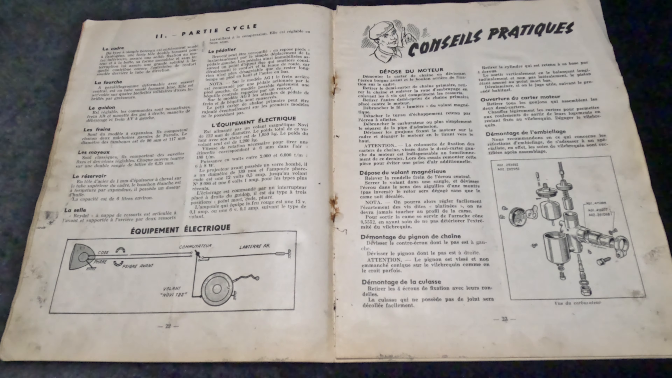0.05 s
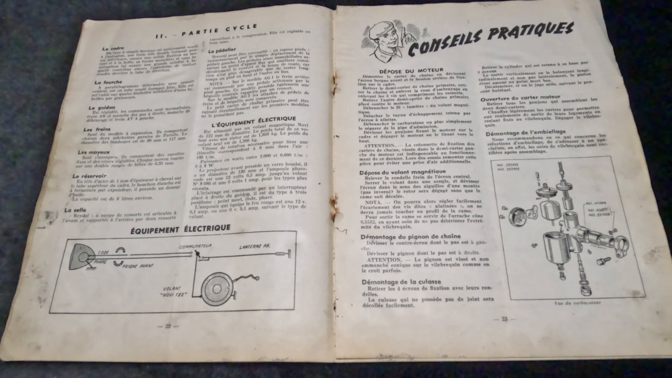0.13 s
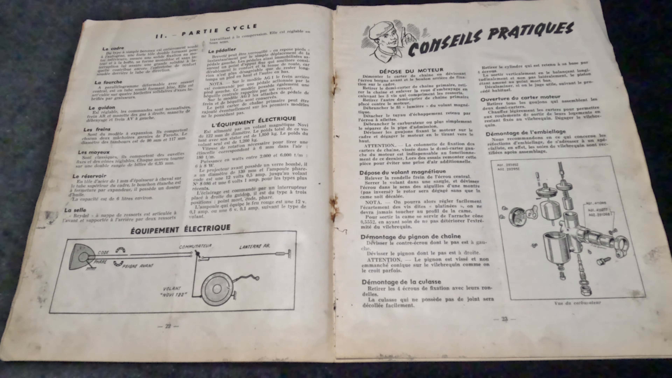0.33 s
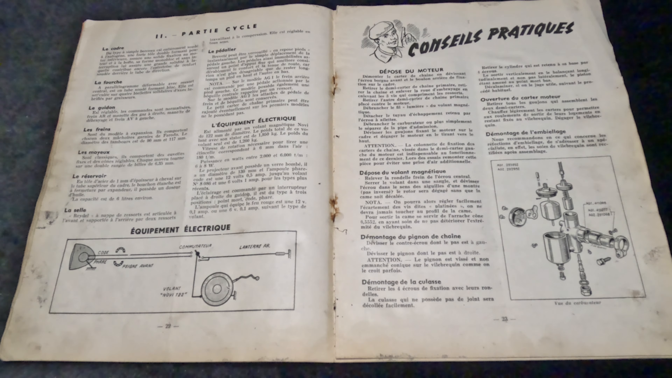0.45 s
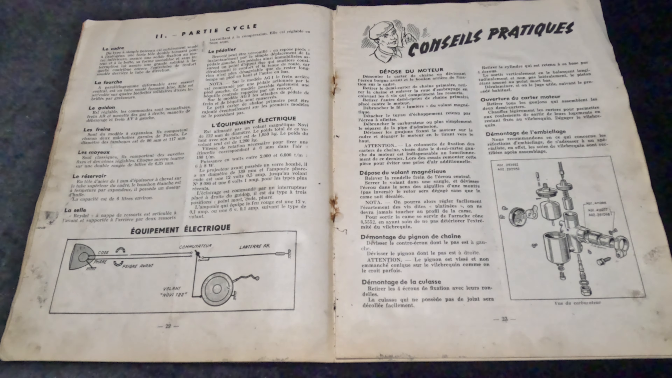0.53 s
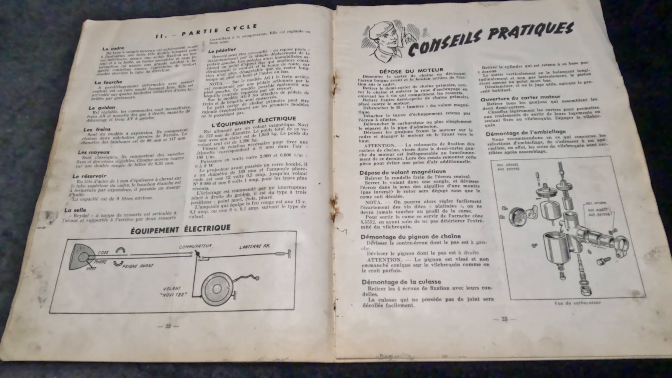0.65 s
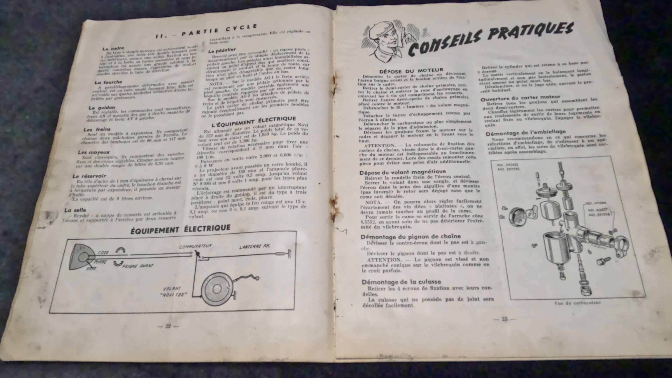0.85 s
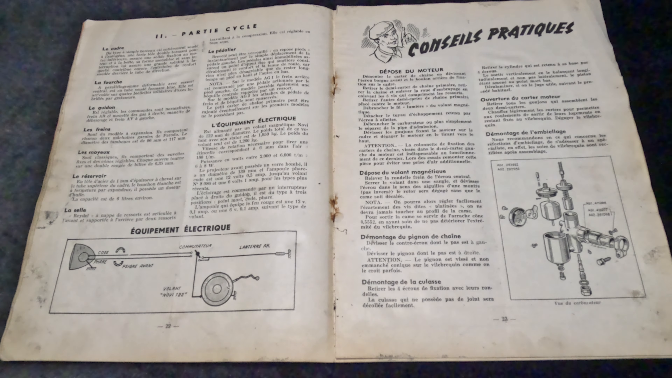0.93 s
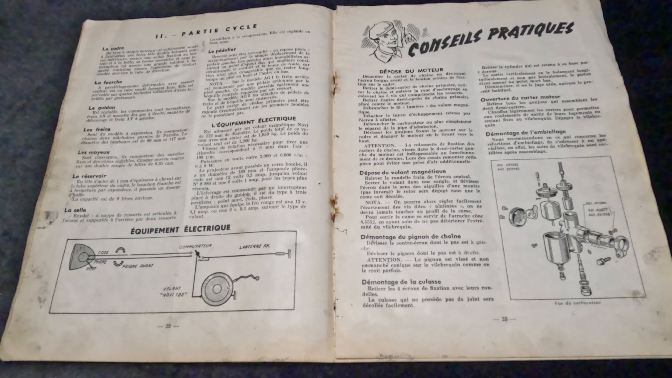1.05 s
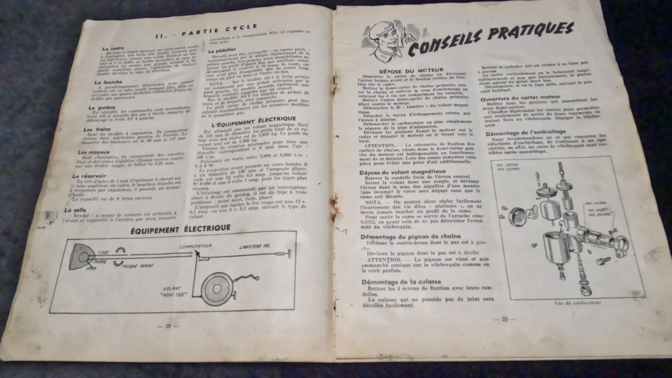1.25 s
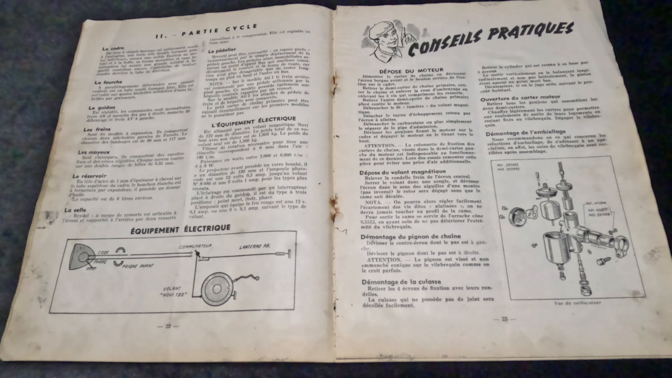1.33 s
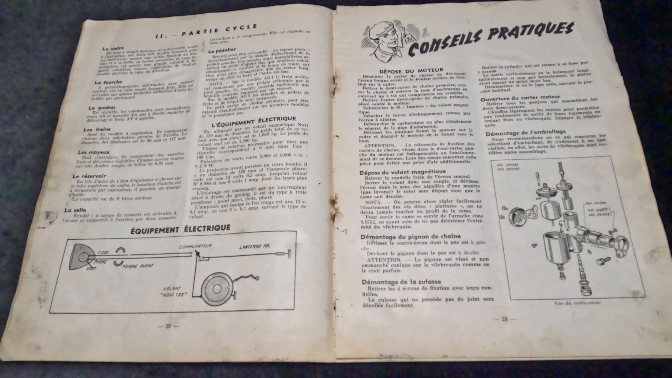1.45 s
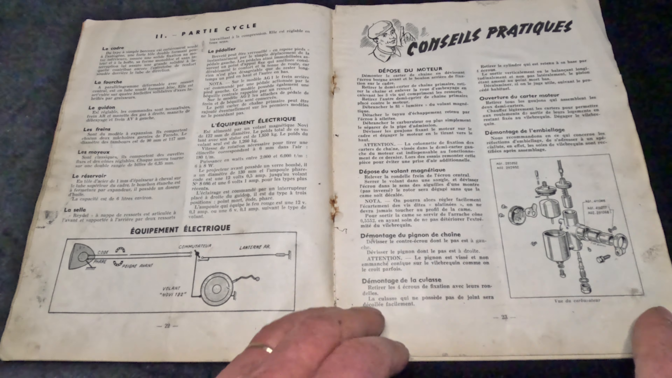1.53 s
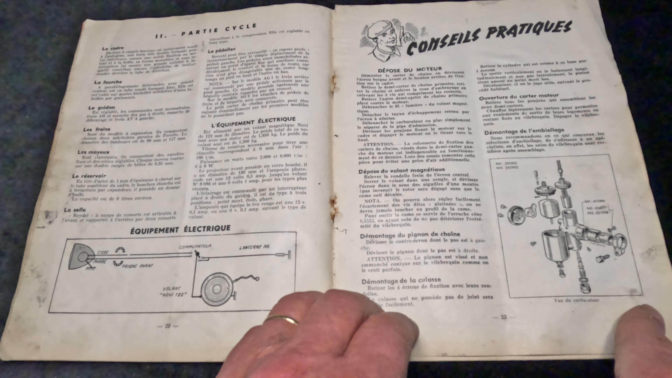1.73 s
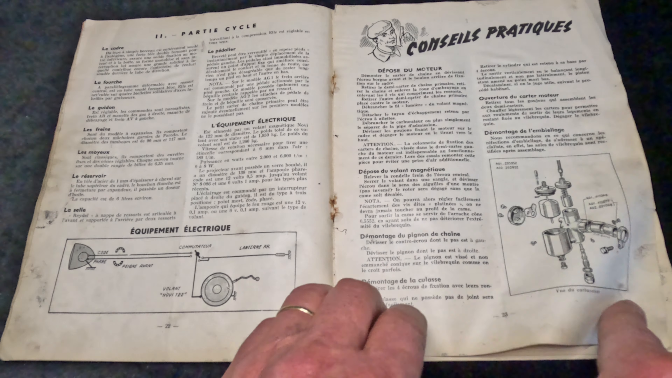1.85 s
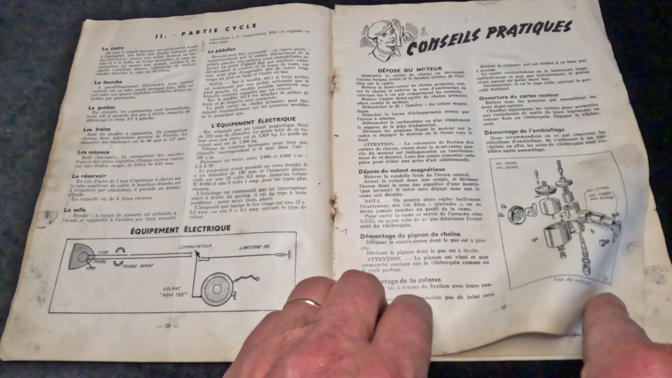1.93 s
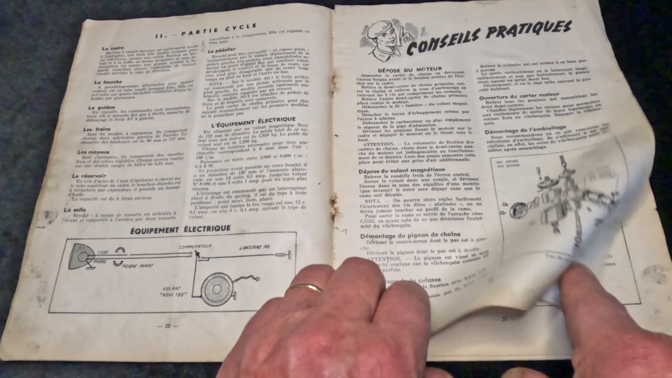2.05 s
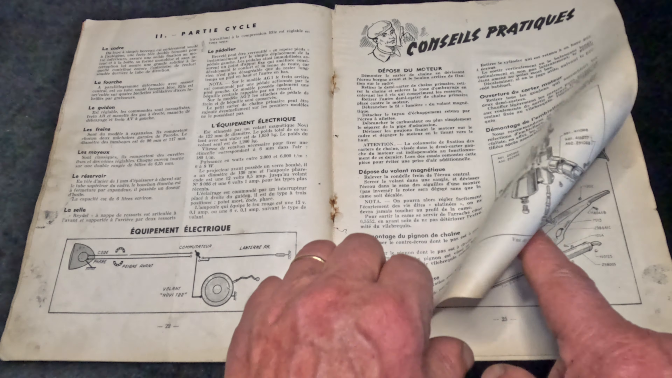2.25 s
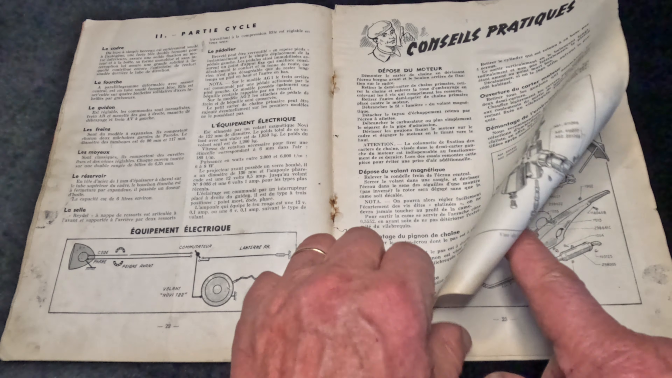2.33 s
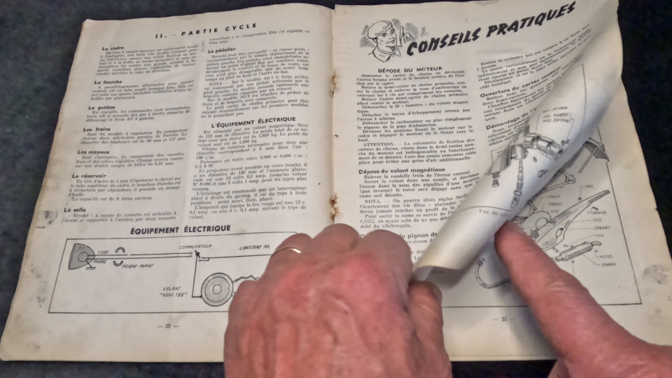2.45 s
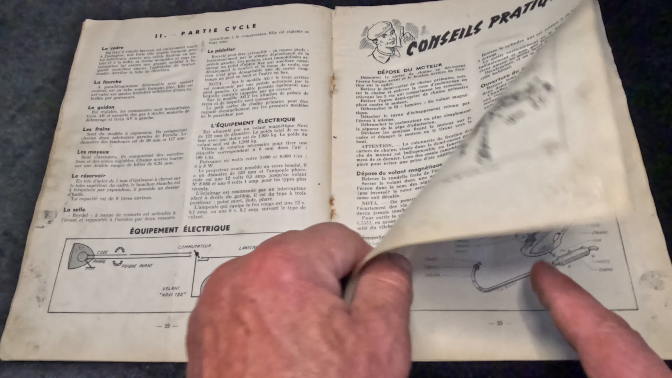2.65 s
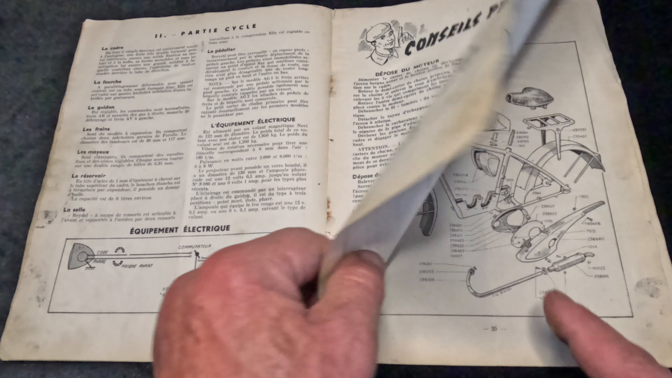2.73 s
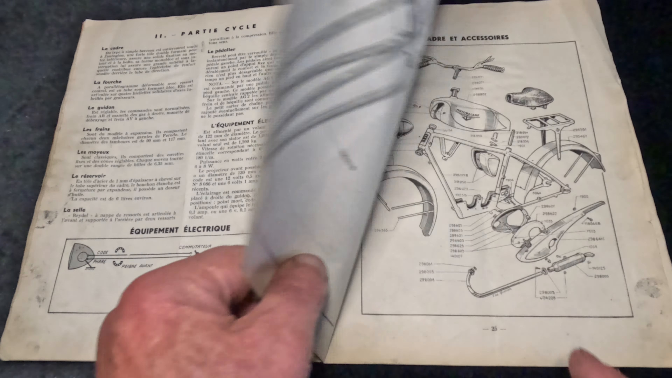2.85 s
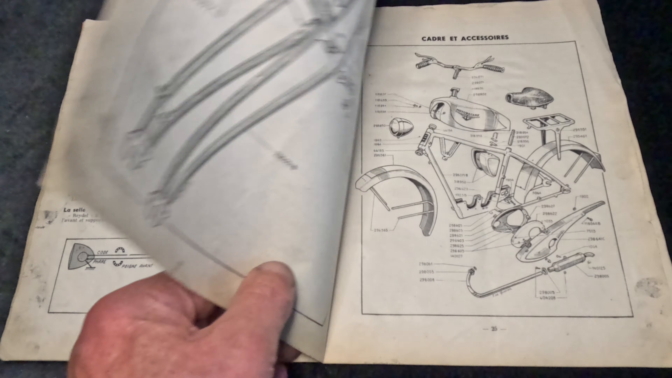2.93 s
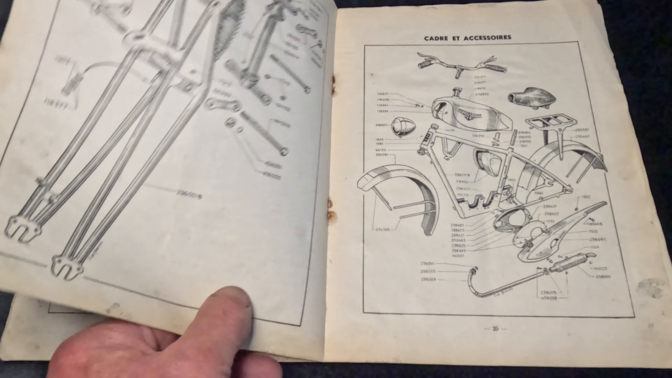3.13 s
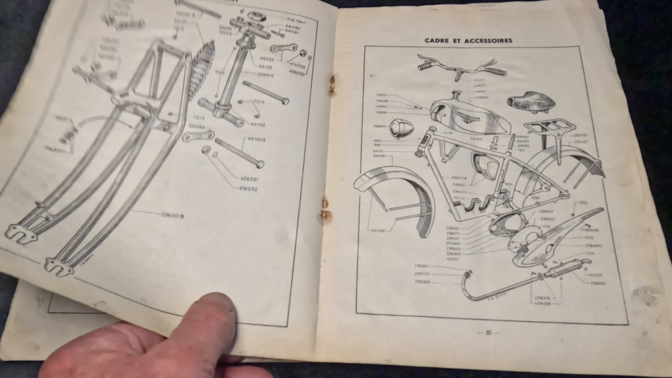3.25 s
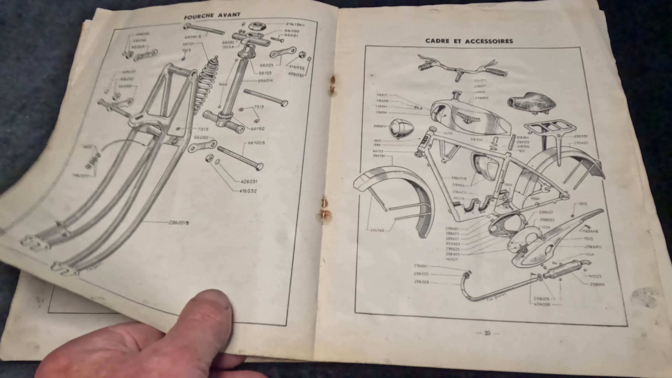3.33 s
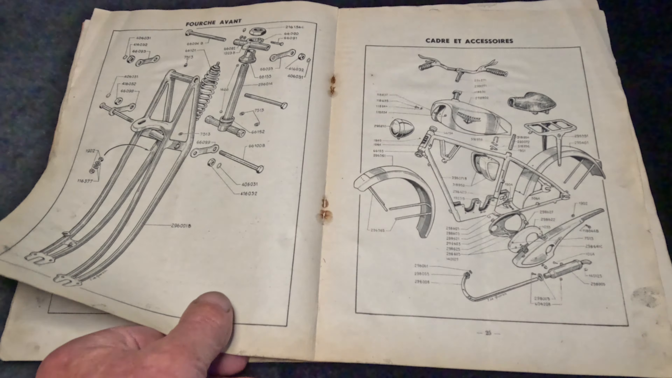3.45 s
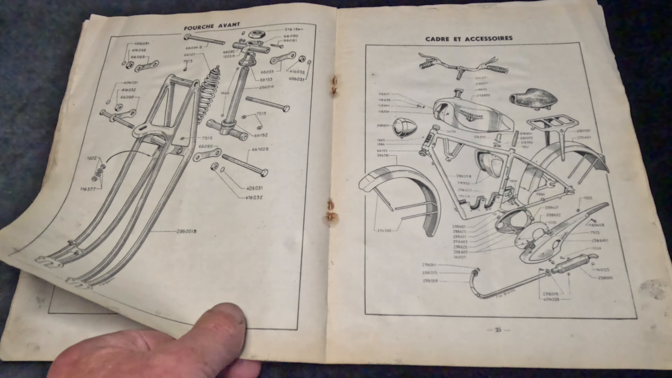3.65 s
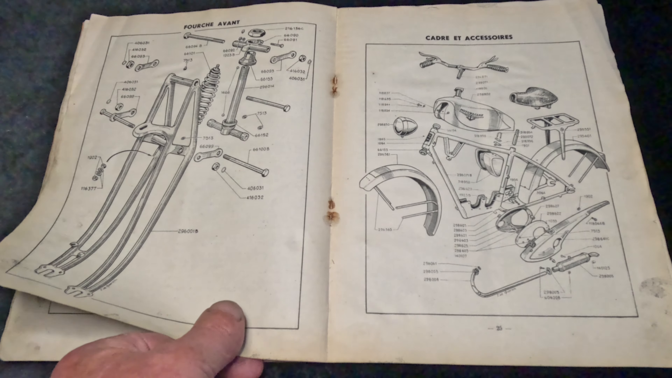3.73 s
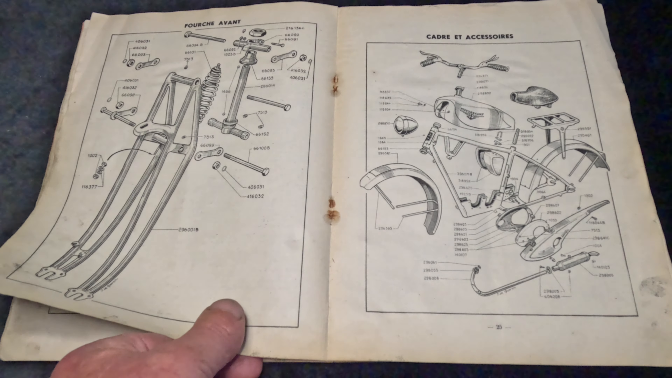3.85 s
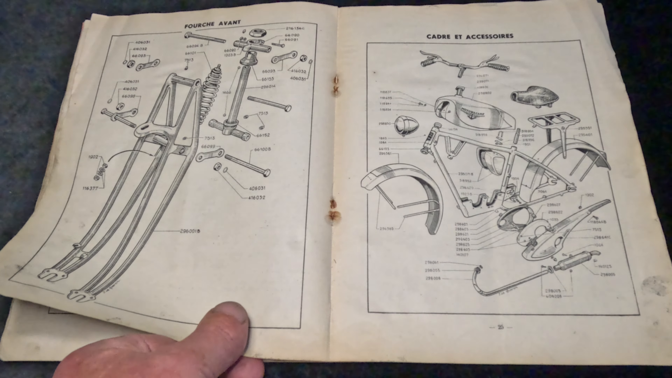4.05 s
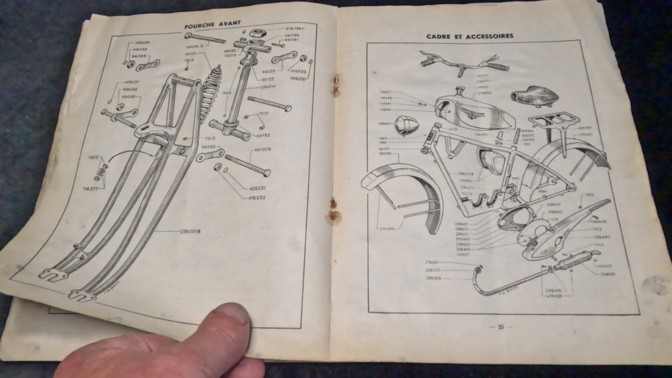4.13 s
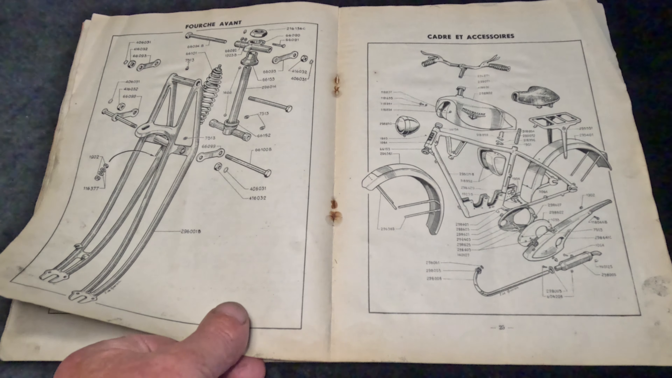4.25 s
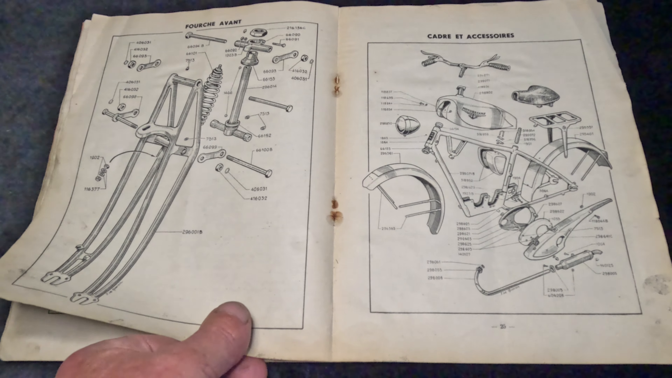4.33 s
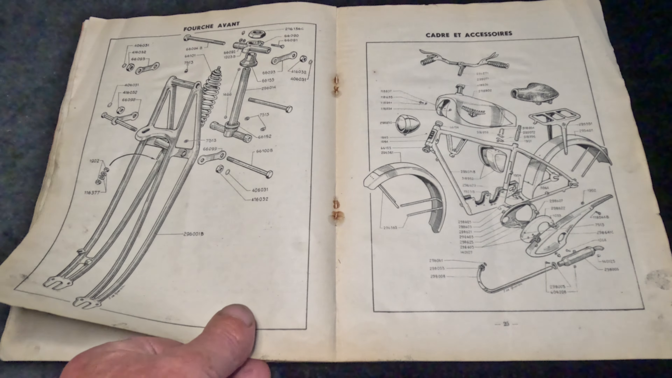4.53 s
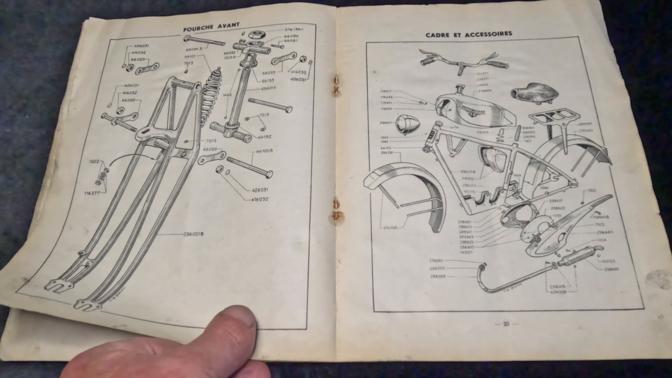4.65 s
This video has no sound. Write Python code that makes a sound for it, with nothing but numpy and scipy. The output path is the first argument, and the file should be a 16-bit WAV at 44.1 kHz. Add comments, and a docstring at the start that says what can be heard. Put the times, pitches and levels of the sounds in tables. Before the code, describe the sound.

Close up, a dry booklet page is peeled, swung over with crisp rustling and pops, and settled with a soft thump and small finger rubs.

```python
"""One page of an old paper booklet is lifted, turned and laid down by hand on a table in a small quiet room.
The sheet slides with a grainy hiss (clicks and noise shaped by touch) and buckles in dry snaps (bursts of folds
that ring the paper's modes). Damped swings make soft thumps, ringing notes make taps, and one rasp swells and
stops dead; then the fingers shift on the paper a few times.
A wavering low room hum and faint air (coloured noise) lie underneath; the stereo microphone is close."""
import sys
import numpy as np
from scipy import signal
from scipy.fft import rfft, irfft
from scipy.io import wavfile
from scipy.ndimage import uniform_filter1d, map_coordinates

SR = 44100
rng = np.random.default_rng(int(sys.argv[2]) if len(sys.argv) > 2 else 0)


def log_audio(samples):
    """Write samples as a 16-bit WAV file to the path given in sys.argv[1]."""
    # one column per channel
    frames = np.atleast_2d(samples).T
    # limit to full scale, then quantise
    limited = np.clip(frames, -1, 1)
    pcm = np.round(limited * 32767).astype(np.int16)
    wavfile.write(sys.argv[1], SR, pcm)


N = 325899
TIME = np.arange(N) / SR
BINS = np.maximum(np.fft.rfftfreq(N, 1 / SR), 1)

# resonances of the bent sheet: (frequency [Hz], width [Hz], relative level [dB])
SHEET_MODES = [(1036, 73, 5), (1200, 89, 7), (1620, 350, 3.5), (2110, 220, 0.5), (2530, 320, 1.5),
               (3000, 280, 0), (3700, 210, 5.5), (5000, 710, 0), (6860, 1200, -3), (9800, 1400, -10)]
# the fingers peel the page up, swing it over and lay it down, before trims:
# (time [s], friction [dB], rustle of the broad sheet [dB])
PEEL_UP = [(1.75, -91, -78), (1.79, -48, -73), (1.825, -42, -52), (1.92, -39.5, -41.5), (2.02, -45, -51.5),
           (2.09, -43.5, -44.5), (2.22, -46, -46), (2.315, -52, -47.5), (2.35, -48, -50),
           (2.47, -47.5, -46), (2.51, -58, -55)]
SWING_OVER = [(2.51, -47, -55), (2.56, -46.5, -40), (2.63, -49, -44.5), (2.665, -46.5, -39.5),
              (2.78, -49.5, -43), (2.84, -49.5, -41), (2.94, -50, -46.5), (3.04, -50.5, -48),
              (3.1, -56.5, -54.5), (3.125, -50, -46), (3.17, -54.5, -57)]
LAY_FLAT = [(3.17, -54.5, -52.5), (3.29, -44.5, -45), (3.385, -48.5, -46.5), (3.42, -53, -52),
            (3.465, -56, -61), (3.5, -50.5, -62), (3.545, -53, -53.5), (3.64, -43.5, -52.5),
            (3.71, -61, -64)]
PAGE_TURN = PEEL_UP + SWING_OVER + LAY_FLAT


def from_db(db):
    """Decibels to gain."""
    return 10 ** (np.asarray(db) / 20)


def rms_one(x):
    """Scale to unit rms."""
    return x / np.sqrt(np.mean(x ** 2) + 1e-20)


def per_bin(points):
    """A (frequency [Hz], value) table joined on a log-frequency axis."""
    hz, value = np.transpose(points)
    return np.interp(np.log(BINS), np.log(hz), value)


def over_time(points):
    """A (time [s], value) table joined by straight lines."""
    return np.interp(TIME, *np.transpose(points))


def coloured(x, spectrum):
    """Filter by a spectrum table, then scale to unit rms."""
    return rms_one(irfft(rfft(x) * from_db(per_bin(spectrum)), N))


def gain_curve(table, column):
    """Gain in time from one dB column of a movement, silent before and after it."""
    rows = np.array(table)
    gain = np.zeros(N)
    during = (TIME >= rows[0, 0]) & (TIME < rows[-1, 0])
    gain[during] = from_db(np.interp(TIME[during], rows[:, 0], rows[:, column]))
    return uniform_filter1d(gain, size=128)


def drift(rate_hz):
    """Slow random wandering with unit rms."""
    points = 8192
    hz = np.fft.rfftfreq(points, N / SR / points)
    slow = rms_one(irfft(rfft(rng.standard_normal(points)) / (1 + (hz / rate_hz) ** 2), points))
    return np.interp(np.arange(N) * points / N, np.arange(points), slow)


def cut(x, hz, kind, order=2):
    """Causal high- or low-pass."""
    return signal.sosfilt(signal.butter(order, min(hz, .45 * SR), kind, fs=SR, output="sos"), x)


def resonance(x, hz, width_hz):
    """A two-pole resonance with gain 1 on top."""
    r = np.exp(-np.pi * width_hz / SR)
    feedback = [1, -2 * r * np.cos(2 * np.pi * hz / SR), r * r]
    return signal.lfilter(np.array([1, 0, -1]) * (1 - r * r) / 2, feedback, x)


def panned(db):
    """Left and right gains for a left-minus-right difference."""
    return from_db(np.array([db, -db]) / 2)


def add(out, s, sound, peak_db):
    """Lay a short sound in at a time and a peak level."""
    at = round(s * SR)
    out[at:at + len(sound)] += (from_db(peak_db) * sound / np.abs(sound).max())[:N - at]


def stroke(t, rise_s, hold_s, release_db_per_s):
    """Gain of one hand movement: it swells, sags a little while held, and dies away."""
    rise_db, sag_db_per_s = 21.5, 8
    rise_s = max(rise_s, .003)
    rising = rise_db * np.minimum(t / rise_s - 1, 0)
    sagging = sag_db_per_s * np.maximum(t - rise_s, 0)
    releasing = release_db_per_s * np.maximum(t - rise_s - hold_s, 0)
    return from_db(np.maximum(rising - sagging - releasing, -200))


def fibres(per_s, spread_db, smooth_db, judder_db):
    """Fibres catch and let go: tiny uneven clicks over a smooth hiss, in clumps as the sheet judders."""
    sizes = from_db(spread_db * np.minimum(rng.exponential(1, N), 3)) * rng.choice([-1, 1], N)
    clicks = rms_one(sizes * (rng.random(N) < per_s / SR))
    smooth = from_db(smooth_db) * rng.standard_normal(N)
    return (clicks + smooth) * from_db(judder_db * drift(24))


def pops(per_s, spread_db, clump_db):
    """Lone clicks of uneven size that come in clumps."""
    at = np.flatnonzero(rng.random(N) < per_s / SR * from_db(clump_db * drift(14)))
    out = np.full(N, 1e-18)
    sizes = from_db(spread_db * np.minimum(rng.exponential(1, len(at)), 2))
    out[at] = sizes * rng.choice([-1, 1], len(at))
    return out


def room_tone(spectrum):
    """Steady stereo noise, partly alike in both channels, with a left-right balance that varies with pitch."""
    # (frequency [Hz], left-right likeness [0-1])
    likeness = [(30, 0.98), (80, 0.72), (130, 0.87), (290, 0.49), (640, 0.18), (3000, 0.44), (6800, 1),
                (14000, 0.12)]
    # (frequency [Hz], left minus right [dB])
    balance = [(60, -2.5), (150, -3.5), (380, -6), (950, -5), (2370, 0), (5950, 3), (14900, 9.5)]
    mid, side = rfft(rng.standard_normal((2, N)))
    alike = np.clip(per_bin(likeness), 0, 1)
    pair = np.sqrt(1 + alike) * mid + np.sqrt(1 - alike) * side * [[1], [-1]]
    return coloured(irfft(pair * panned(per_bin(balance)), N), spectrum)


def air():
    """Faint steady noise fills the room above the hum."""
    # (frequency [Hz], relative density [dB])
    air_spectrum = [(300, -12), (480, 0.5), (800, -4), (1250, -2), (1900, -9.5), (3500, -15.3),
                    (7600, -18.5), (8300, -23.5), (10800, -22.5), (12000, -30.5), (15000, -39.5)]
    return from_db(-62.3) * room_tone(air_spectrum)


def hum(hum_hz=168, width_hz=42, bed_db=-58, waver_db=3.0, rumble_hz=55, rumble_db=-71.0, rumble_waver_db=6.0):
    """A broad, steady drone with one low resonance that wavers, over a deep rumble that comes and goes."""
    # (frequency [Hz], relative density [dB])
    hum_spectrum = [(12, -31), (20, -4), (51, -7), (70, -12.5), (92, -10.5), (114, -28), (134, -7.5),
                    (163, -3), (276, -8.5), (312, -8), (338, -9), (372, -13.5), (403, -13), (500, -22.5),
                    (650, -20.5), (1100, -120)]
    # level of the low resonance before it wavers: (time [s], level [dB])
    resonance_swell = [(0.0, -49), (0.28, -64), (1.4, -62), (1.54, -51.5), (1.7, -79), (2.1, -52.5),
                       (2.7, -70), (3.45, -52.5), (3.62, -52.5), (3.9, -59.5), (7.39, -64.5)]
    bed = cut(room_tone(hum_spectrum), rumble_hz, "high")
    low = room_tone(hum_spectrum)
    swell = from_db(over_time(resonance_swell) + waver_db * drift(1.2))
    rumble_gain = from_db(rumble_db + rumble_waver_db * drift(5.5))
    rumble = rumble_gain * rms_one(cut(low, rumble_hz, "low", order=4))
    return from_db(bed_db) * bed + swell * rms_one(resonance(low, hum_hz, width_hz)) + rumble


def room(x, wet_db, echo_db=-35.0, wall_hz=6500, count=6):
    """Direct sound, a few echoes off table and hands, and a dull diffuse tail that differs at each ear."""
    t60_s = 0.4
    t = TIME[:SR // 2]
    noise = cut(rng.standard_normal((2, len(t))), wall_hz, "low", order=1)
    tail = noise * from_db(-60 * t / t60_s) * (t > .004)
    tail *= from_db(wet_db) / np.sqrt(np.sum(tail ** 2, axis=1, keepdims=True))
    echo_at = (SR * rng.uniform(.003, .022, count)).astype(int)
    tail[:, echo_at] += from_db(echo_db) * rng.choice([-1, 1], count) / np.sqrt(count)
    return x + signal.fftconvolve(x[None], tail, axes=1)[:, :N]


def ports(pair):
    """The two microphone ports hear the page with their own colour and phase."""
    # (frequency [Hz], left minus right [dB])
    port_balance = [(60, 6), (150, 4), (290, 5), (640, 2.5), (1400, 5), (2800, 4), (6800, 4.5),
                    (14000, 7.5)]
    # (frequency [Hz], lead of the left port [rad])
    port_phase = [(600, 0.1), (1380, -0.35), (2100, -0.55), (3000, -0.7), (3900, -0.17), (4600, 0.0),
                  (12000, 0.0)]
    turn = np.exp(.5j * per_bin(port_phase) * [[1], [-1]])
    return irfft(rfft(pair) * turn * panned(per_bin(port_balance)), N)


def thumps(cycles=8.1, longest_s=0.077, press_t60=0.059, focus_db_per_octave=10.0):
    """Soft contacts: damped swings of the paper stack, while a brief press wakes table modes near that pitch."""
    # hand and page bump on the booklet: (time [s], peak [dB], pitch [Hz])
    bumps = [(1.571, -40.5, 45), (1.591, -40.5, 33), (2.003, -43, 324), (2.058, -49, 172),
             (2.168, -44, 290), (2.8623, -33, 310), (2.885, -48, 250), (3.117, -48, 150), (3.147, -48, 169),
             (3.169, -38.5, 42), (3.586, -34.5, 76.6), (3.587, -36, 241), (3.602, -43, 280),
             (3.612, -40.5, 148), (4.506, -54, 175), (4.955, -48, 222)]
    # the booklet on its table: (frequency [Hz], width [Hz], relative level [dB])
    stack_modes = [(77.6, 16, -7.5), (164, 22, 10.5), (287, 25, 5.5), (605, 100, 4)]
    out, t = np.zeros(N), TIME[:SR // 5]
    for (s, peak_db, hz), grain in zip(bumps, rng.standard_normal((len(bumps), len(t)))):
        # down 60 dB after the cycles or the longest time, whichever is shorter
        swing = np.sin(2 * np.pi * hz * t) * from_db(-60 * t * max(hz / cycles, 1 / longest_s))
        press = (1 + grain) * from_db(-60 * t / press_t60)
        table = np.zeros(len(t))
        for mode_hz, width_hz, db in stack_modes:
            focus = from_db(db - focus_db_per_octave * abs(np.log2(mode_hz / hz)))
            table += focus * resonance(press, mode_hz, width_hz)
        add(out, s, cut(swing + table / np.abs(table).max(), hz / 2, "high"), peak_db)
    return out


def thumb_rubs():
    """Skin drags on the arched page, which answers in a few hollow resonances, higher when bent tighter."""
    # the thumb on the hollow page: (start [s], rise [s], hold [s], level [dB], release [dB/s], pitch [Hz])
    drags = [(3.255, .02, 0.12, -53, 200, 1610), (3.79, 0.017, .005, -53, 148, 1360),
             (4.792, 0.043, 0.14, -54, 252, 1663), (5.463, 0.013, 0.027, -54, 53, 1330)]
    # the arch at its reference pitch: (frequency [Hz], width [Hz], relative level [dB])
    hollow_modes = [(1080, 24, 8.5), (1360, 290, 3), (1640, 70, -9)]
    reference_hz = 1360
    skin = fibres(per_s=520, spread_db=3.5, smooth_db=-3.5, judder_db=1.0)
    out = np.zeros(N)
    for s, rise_s, hold_s, level_db, release, pitch_hz in drags:
        tight = pitch_hz / reference_hz
        ring = np.zeros(N)
        for hz, width_hz, db in hollow_modes:
            narrow = resonance(skin, tight * hz, width_hz)
            ring += from_db(db) * resonance(narrow, tight * hz, 4 * width_hz)
        out += from_db(level_db) * rms_one(ring) * stroke(TIME - s, rise_s, hold_s, release)
    return out


def taps(width_hz=70, scuff_db=-23.0, scuff_t60=0.044, trim_db=-9.0):
    """A soft fingertip lands with a brief scuff and sets one hollow note of the paper ringing."""
    # fingertips tap and pluck the stiff paper: (time [s], peak before trim [dB], pitch [Hz])
    fingertips = [(1.716, -36.5, 1223), (1.745, -48, 1240), (2.265, -29, 994), (2.337, -23.5, 1190),
                  (3.862, -33.5, 1230), (3.977, -28, 2430), (4.212, -42, 1060), (4.427, -31, 2690),
                  (4.478, -38, 1080), (4.494, -40, 1200), (5.467, -44, 1200), (5.515, -37, 1250),
                  (5.716, -43, 620), (5.729, -46.5, 1490)]
    out, t = np.zeros(N), TIME[:SR // 8]
    for (s, peak_db, hz), scuff in zip(fingertips, rng.standard_normal((len(fingertips), len(t)))):
        force = (t == 0) + scuff * from_db(scuff_db - 60 * t / scuff_t60)
        note = resonance(resonance(force, hz, width_hz), hz, 4 * width_hz)
        add(out, s, note, peak_db + trim_db)
    return out


def flick(low_hz=2400, high_hz=5400, swell_db_per_s=337, stop_db_per_s=3000):
    """The edge rasps louder and louder under the thumb, then stops dead as it slips free."""
    release_s, top_db = 4.955, -36
    grain = fibres(per_s=2000, spread_db=4.0, smooth_db=3.0, judder_db=2.5)
    rasp = cut(cut(grain, low_hz, "high"), high_hz, "low", order=4)
    t = TIME - release_s
    shape_db = np.maximum(np.minimum(swell_db_per_s * t, -stop_db_per_s * t), -200)
    return rms_one(rasp) * from_db(top_db + shape_db)


def flexing():
    """The lifted page flexes with a low flutter as it rustles, and flaps a few times."""
    # the loose page flaps: (start [s], rise [s], hold [s], level [dB])
    flap_strokes = [(2.533, 0.013, .003, -45.5), (2.806, 0.013, 0.049, -43), (3.12, 0.026, 0.011, -56),
                    (3.211, 0.033, .003, -52.5), (3.573, 0.016, .005, -61), (5.463, 0.0047, 0.025, -56)]
    # (frequency [Hz], relative density [dB])
    flex_spectrum = [(130, -39), (200, 1.5), (320, 5), (450, -2), (680, 5.5), (820, 3.5), (1100, -43)]
    flaps = sum(from_db(db) * stroke(TIME - s, rise_s, hold_s, release_db_per_s=262)
                for s, rise_s, hold_s, db in flap_strokes)
    # above a rustle of -47 dB the flutter grows no more
    flutter = from_db(-20) * np.minimum(gain_curve(PAGE_TURN, column=2), from_db(-47))
    return np.hypot(flaps, flutter) * coloured(rng.standard_normal(N), flex_spectrum)


def snaps(folds_per_s=1800, folds_db=-2.5, scuff_db=-26.0, shiver_db=-36, shiver_t60=0.038, uneven_db=3.5,
          ring_db=3.5, mode_shift=0.04, crack_db=-26.0, crack_hz=10000, trim_db=-1.3):
    """A crease pops, ragged smaller folds follow, and the sheet shivers on in modes shifted for each snap."""
    # the sheet buckles; a wide fold sounds low, a tight one high:
    # (time [s], level before trim [dB], lowest [Hz], highest [Hz], time in which the folds fall 60 dB [s])
    buckles = [(1.565, -61, 2000, 9000, .01), (1.8173, -32, 3100, 5300, .003),
               (1.842, -37, 1800, 4000, .002), (1.8451, -28, 1970, 3600, .004),
               (1.8897, -34, 1300, 3800, 0.0043), (1.8966, -28.5, 1100, 3700, 0.0023),
               (1.8962, -39, 900, 2700, 0.0046), (1.9046, -29, 2290, 3700, 0.0017),
               (1.906, -29, 2300, 4200, .002), (1.9062, -34, 900, 1150, 0.032),
               (1.923, -35, 2300, 4300, 0.014), (1.959, -33.5, 900, 3300, .003),
               (1.961, -37.5, 900, 2700, .004), (2.1004, -33, 1010, 2700, 0.0042),
               (2.102, -39.5, 1000, 2480, .007), (2.2074, -32, 1790, 2700, 0.0035),
               (2.209, -30, 1900, 2770, 0.0055), (2.222, -35, 1070, 2400, 0.0071),
               (2.452, -39, 1200, 3600, .012), (2.542, -36, 950, 1300, 0.044),
               (2.5483, -37, 1000, 2200, .002), (2.5512, -30.5, 1060, 2580, 0.0024),
               (2.5532, -31, 1100, 2700, 0.0044), (2.565, -39, 950, 1700, 0.018),
               (2.6478, -32.5, 1400, 2300, 0.0032), (2.652, -40, 1400, 3000, .003),
               (2.7635, -42, 950, 2000, .004), (2.8098, -30.5, 2000, 3700, .002),
               (2.8122, -34, 2200, 3500, .003), (2.8137, -31.5, 945, 1400, 0.02),
               (2.8221, -29.5, 1090, 3380, 0.0028), (2.8253, -29.5, 945, 3000, 0.0026),
               (2.8305, -37, 900, 1500, .012), (2.843, -44, 900, 1800, 0.008),
               (2.8559, -34, 1400, 3740, 0.0025), (2.8583, -29, 1300, 2800, 0.0065),
               (3.2538, -35, 1280, 2200, .003), (3.256, -28, 1260, 1910, 0.013),
               (3.259, -40, 820, 1150, 0.02), (3.292, -38.5, 1900, 6000, .015),
               (3.772, -43.5, 3500, 6800, .002), (3.7762, -30.5, 1030, 2600, 0.00067),
               (3.7785, -34.5, 1400, 2390, 0.0044), (3.9778, -43, 2380, 3000, .008),
               (4.143, -56, 2500, 9000, .003), (4.3825, -44, 2400, 6040, .003),
               (4.403, -49, 2500, 8500, .003), (4.4248, -38, 2370, 7150, .002),
               (4.43, -47, 2400, 7500, .002), (4.434, -50, 2400, 5000, 0.0027),
               (4.832, -43, 4800, 6800, 0.013), (4.8445, -53, 4800, 8000, .004),
               (5.468, -53, 900, 2680, .004)]
    out, t = np.zeros(N), TIME[:SR // 8]
    for s, db, low_hz, high_hz, crumple_s in buckles:
        signs = (rng.random(len(t)) < folds_per_s / SR) * rng.choice([-1, 1], len(t))
        folds = signs * rng.uniform(0.29, 1, len(t))
        grain = rng.standard_normal(len(t))
        crumple = from_db(folds_db) * folds + from_db(scuff_db) * grain
        shiver = grain * from_db(shiver_db - 60 * t / shiver_t60)
        force = crumple * from_db(-60 * (t / crumple_s) ** 1.3) + shiver + (t == 0)
        ring = np.zeros(len(t))
        for hz, width_hz, mode_db in SHEET_MODES:
            mode_gain = from_db(mode_db + uneven_db * rng.standard_normal())
            shifted_hz = hz * np.exp(mode_shift * rng.standard_normal())
            ring += mode_gain * resonance(force, shifted_hz, width_hz)
        body = cut(force + from_db(ring_db) * ring, low_hz, "high", order=3)
        snap = cut(body, high_hz, "low", order=4) + from_db(crack_db) * cut(force, crack_hz, "low")
        # the level is the rms of the first 8 ms; add() wants the peak
        crest = np.abs(snap).max() / np.sqrt(np.mean(snap[t < .008] ** 2))
        add(out, s, snap, db + trim_db + 20 * np.log10(crest))
    return out


def crackles(sheet, hiss, per_s=45, spread_db=0.5, soft_hz=3800, tick_low_hz=3200, tick_high_hz=8000):
    """Small folds give way at random in the modes of the bending sheet; fibres tick as it slides."""
    folds = sum(from_db(db / 2) * rms_one(resonance(pops(per_s, spread_db, clump_db=4.5), hz, 2 * width_hz))
                for hz, width_hz, db in SHEET_MODES)
    folds = cut(cut(folds, soft_hz, "low"), 770, "high", order=4)
    ticks = cut(pops(per_s=110, spread_db=5.0, clump_db=6.0), tick_low_hz, "high")
    ticks = cut(ticks, tick_high_hz, "low", order=4)
    return from_db(-5) * sheet * rms_one(folds) + from_db(-14) * hiss * rms_one(ticks)


def touch(friction, lightness_db, sizzle_db):
    """Share friction between a firm rasp and a light hiss, with a fine sizzle above it."""
    rasp = friction / np.hypot(1, from_db(lightness_db))
    hiss = rasp * from_db(lightness_db)
    return np.array([rasp, hiss, hiss * from_db(sizzle_db)])


def handling():
    """The turn and the brushes together: gains of rasp, hiss and sizzle, and gain of the broad sheet."""
    # how lightly the page bears on the one below, before the firmness term: (time [s], hiss over rasp [dB])
    bearing = [(1.8, -5.5), (2.0, 0.5), (2.2, 5.5), (2.36, -0.5), (2.53, -5.5), (2.6, -4), (2.75, 2.5),
               (3.0, 3), (3.3, 1.5)]
    # fingers and page edges brush the paper: (start [s], rise [s], hold [s], friction [dB], sheet [dB],
    # hiss over rasp [dB], sizzle over hiss [dB])
    brush_strokes = [(1.55, 0.019, 0.0043, -60.5, -62.5, 3, -5), (1.59, 0.033, .01, -66.5, -76, 16, 1),
                     (1.768, 0.035, 0.14, -50, -55, 1.5, 4.5), (2.552, 0.027, .006, -45.5, -53, 0, -2.5),
                     (2.64, 0.0039, .003, -44, -51, 4, -9), (3.696, 0.068, 0.0062, -46.5, -58, 4.5, -10.5),
                     (3.807, 0.025, 0.029, -66, -58.5, 14, -8), (3.916, 0.029, 0.084, -51, -55.5, 4, -14),
                     (4.106, 0.082, 0.007, -56.5, -58, 6, -7.5), (4.222, 0.027, 0.017, -57, -58, 6, -6),
                     (4.284, 0.045, 0.078, -54.5, -59, 5, -5), (4.419, 0.0084, 0.0068, -52, -58, 8, -5.5),
                     (4.64, 0.035, 0.031, -61, -72, 15, -3.5),
                     (4.758, 0.031, 0.039, -52.5, -57.5, 18, -9.5),
                     (4.833, 0.095, 0.0031, -55.5, -59, 9, -3), (5.459, 0.033, 0.038, -62.5, -60, 6, -0.5),
                     (5.528, 0.035, 0.064, -67, -78, 26, -0.5)]
    friction = from_db(-2) * gain_curve(PAGE_TURN, column=1)
    sheet = from_db(-2.5) * gain_curve(PAGE_TURN, column=2)
    # a firmer touch rasps more: 0.06 dB per dB of friction above -75 dB
    firmness_db = 0.06 * (-75 - 20 * np.log10(friction + 1e-9))
    rubbing = touch(friction, firmness_db + over_time(bearing), sizzle_db=-6)
    for start_s, rise_s, hold_s, friction_db, sheet_db, light_db, sizzle_db in brush_strokes:
        near = np.abs(TIME - start_s) < .5
        gain = stroke(TIME[near] - start_s, rise_s, hold_s, release_db_per_s=223)
        brush = touch(from_db(friction_db) * gain, light_db, sizzle_db)
        rubbing[:, near] = np.hypot(rubbing[:, near], brush)
        sheet[near] = np.hypot(sheet[near], from_db(sheet_db) * gain)
    return rubbing, sheet


def wrinkling(x, patchy_db=2.5, rate_hz=28, relative_width=0.12, level_db=0.69, count=12):
    """Wrinkles form and flatten, so narrow parts of the rustle come and go on their own."""
    patches = sum((from_db(patchy_db * drift(rate_hz)) - 1) * resonance(x, hz, relative_width * hz)
                  for hz in np.geomspace(1000, 11000, count))
    return from_db(level_db) * (x + patches)


def curling(x, echo=0.27, gap_s=0.000901, sway=0.479):
    """The curled page reflects its own sound over a changing gap, so the colour keeps shifting."""
    lag = gap_s * SR * np.exp(sway * drift(1.65))
    return (x + echo * map_coordinates(x, [np.arange(N) - lag], order=3)) / np.hypot(1, echo)


def sparkle(sizzle, centre_hz=12500, width_hz=1300, level_db=-16.0):
    """The very top of the sizzle scatters as independent noise on left and right."""
    grain = resonance(resonance(rng.standard_normal((2, N)), centre_hz, width_hz), centre_hz, width_hz)
    return from_db(level_db) * sizzle * rms_one(grain)


def rustle(rubbing, sheet):
    """Paper slides on paper: a firm touch rasps, a light one hisses, and the broad sheet radiates too."""
    # spectra of firm rub, light rub, fine top and broad sheet: (frequency [Hz], relative density [dB])
    rasp_spectrum = [(1500, -28.5), (2350, 2.5), (2650, -0.5), (3050, 1), (3450, 1.5), (3780, 0.5),
                     (4300, -4.5), (4900, -17.5), (6500, -41)]
    hiss_spectrum = [(3200, -26), (4300, -1), (4800, 2.5), (5700, 3), (6500, -1.5), (7500, -4), (8200, -17),
                     (9200, -29), (12000, -48)]
    sizzle_spectrum = [(5500, -7.5), (8000, 5.5), (9200, 3), (10500, 3), (11700, -8), (14000, -14.5),
                       (16000, -58)]
    sheet_spectrum = [(480, -16), (720, -7), (880, -8), (1080, 3.5), (1450, 5.5), (1900, 2.5), (2500, -4),
                      (3200, 1), (4500, -29)]
    contact = fibres(per_s=4000, spread_db=3.5, smooth_db=3.0, judder_db=0.22)
    bending = fibres(per_s=1500, spread_db=-3.0, smooth_db=3.0, judder_db=1.2)
    spectra = (rasp_spectrum, hiss_spectrum, sizzle_spectrum)
    slide = sum(gain * coloured(contact, spectrum) for gain, spectrum in zip(rubbing, spectra))
    broad = sheet * coloured(bending, sheet_spectrum)
    return curling(wrinkling(from_db(2.0) * slide + from_db(0.5) * broad))


def scene():
    """The page moves across the booklet over the room's hum and air."""
    # the page moves from the right towards the left, then slightly back: (time [s], left minus right [dB])
    page_path = [(1.7, -7.5), (2.25, -6.5), (2.75, -5.5), (3.25, -4.5), (4.1, -4), (5.1, -5)]
    rubbing, sheet = handling()
    soft_paper = rustle(rubbing, sheet) + flexing() + thumb_rubs()
    sliding = room(soft_paper, wet_db=-32.0, echo_db=-9.5) + sparkle(rubbing[2])
    sharp_paper = snaps() + taps() + crackles(sheet, rubbing[1])
    buckling = room(sharp_paper, wet_db=-15.5, echo_db=-11.5) + room(flick(), wet_db=-11.0)
    bumping = room(thumps(), wet_db=-15.5)
    paper = ports(sliding + buckling + bumping) * panned(over_time(page_path))
    return paper + hum() + air()


def record(dry):
    """The top is cut steeply above 14350 Hz."""
    return signal.sosfilt(signal.ellip(10, .1, 80, 14350, fs=SR, output="sos"), dry)


dry = scene()
out = record(dry)
log_audio(out)
```